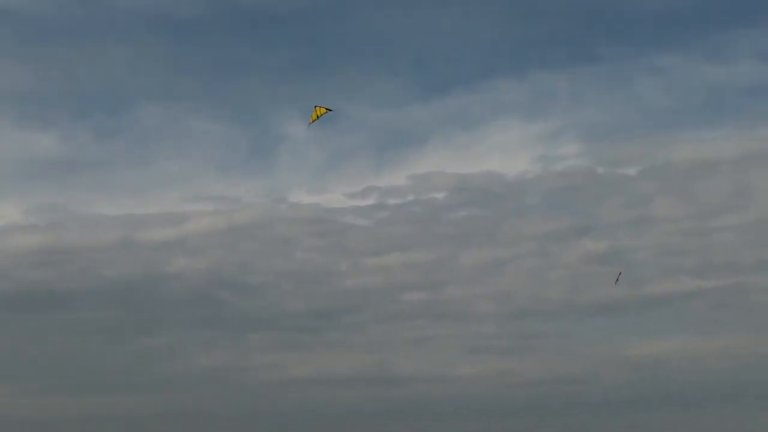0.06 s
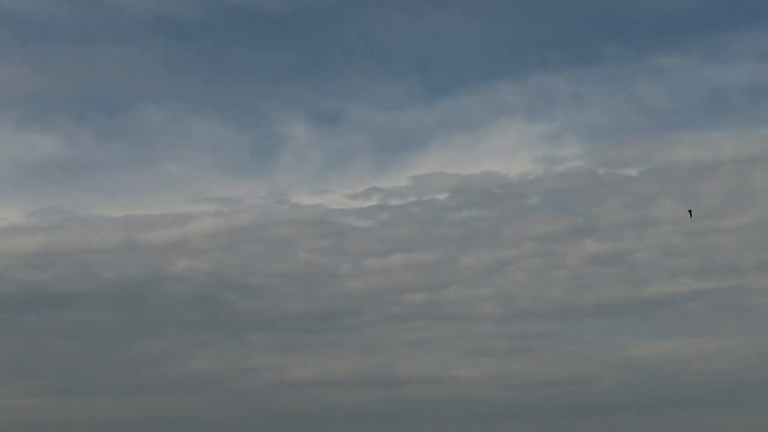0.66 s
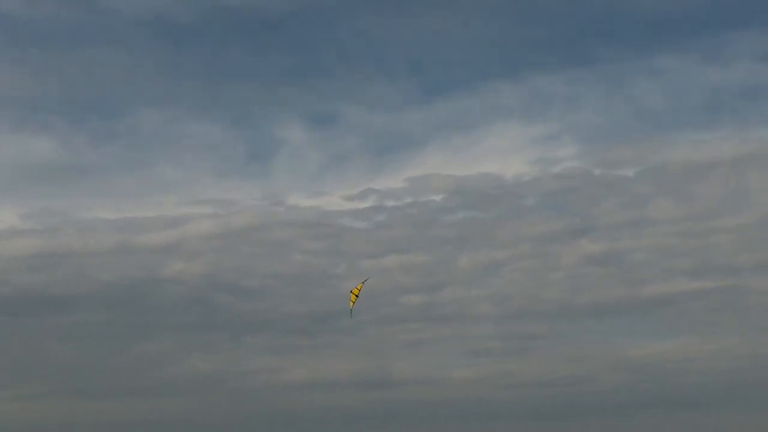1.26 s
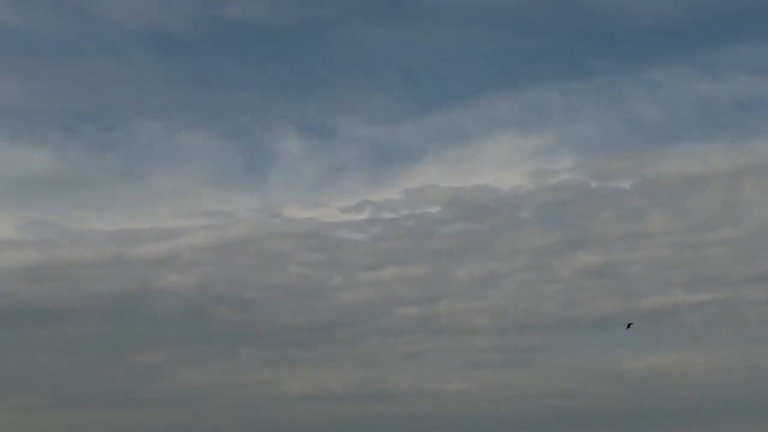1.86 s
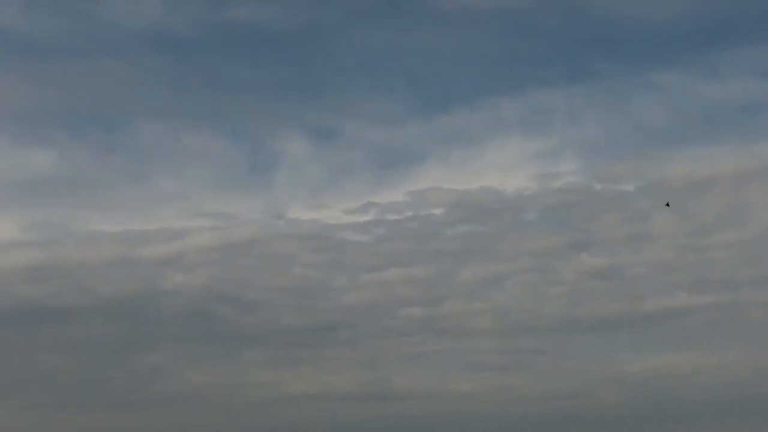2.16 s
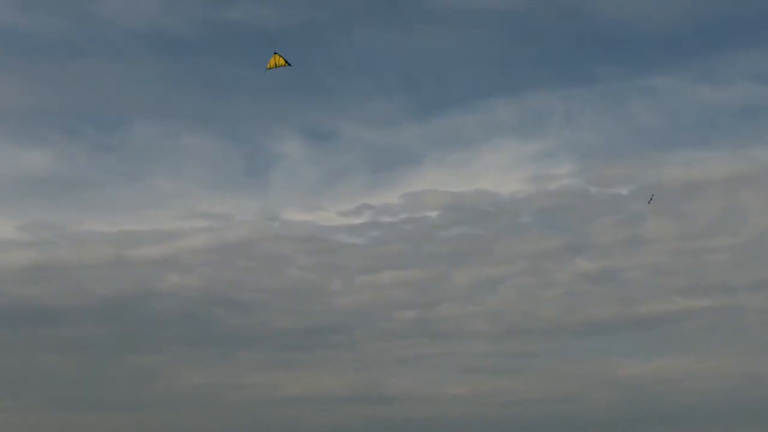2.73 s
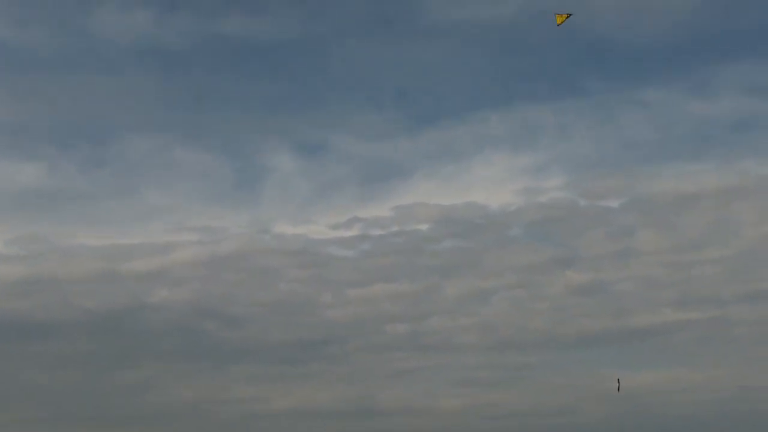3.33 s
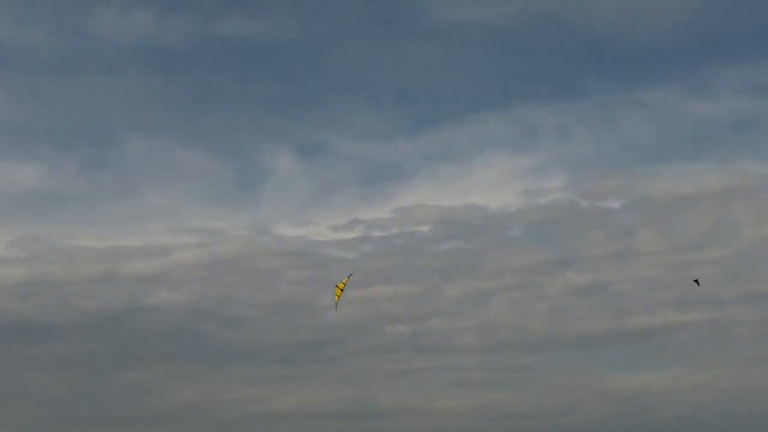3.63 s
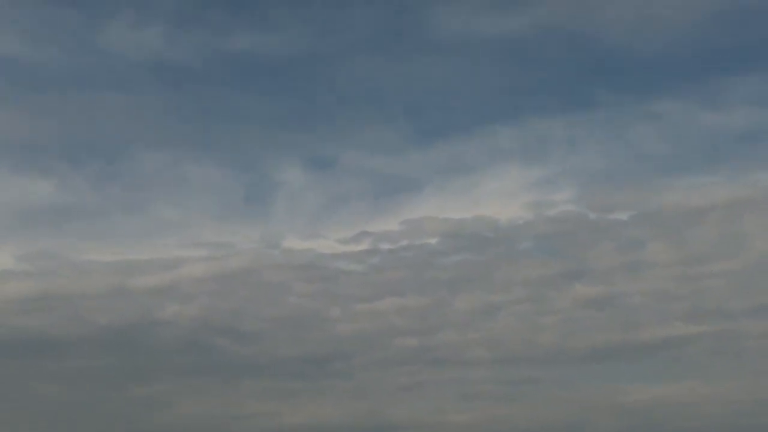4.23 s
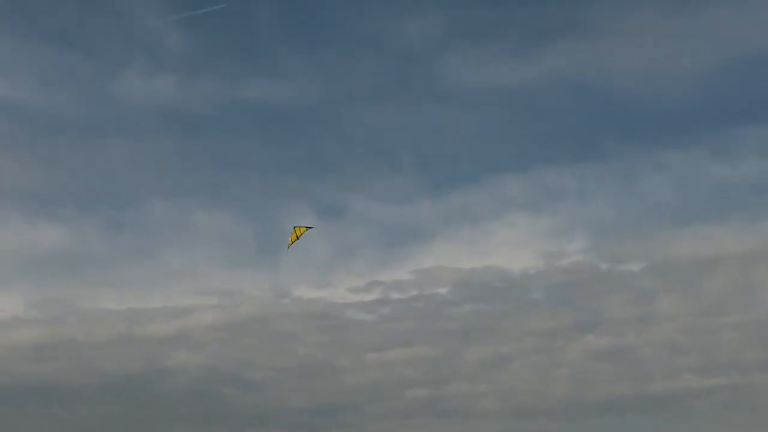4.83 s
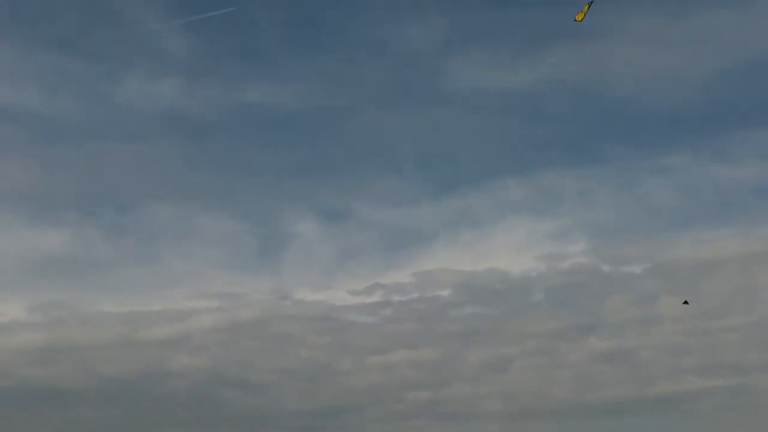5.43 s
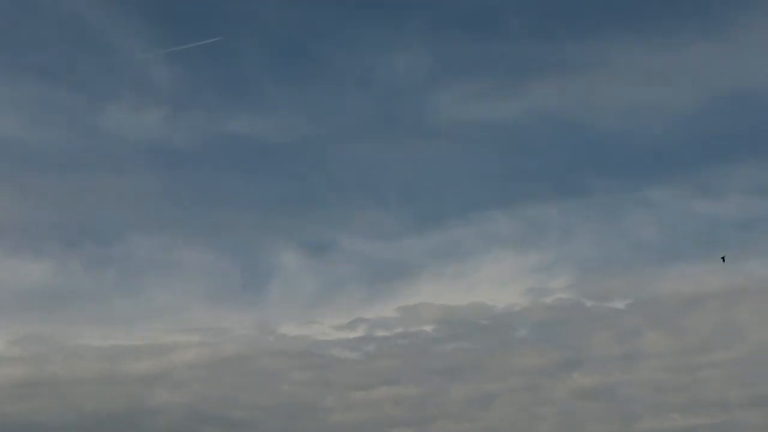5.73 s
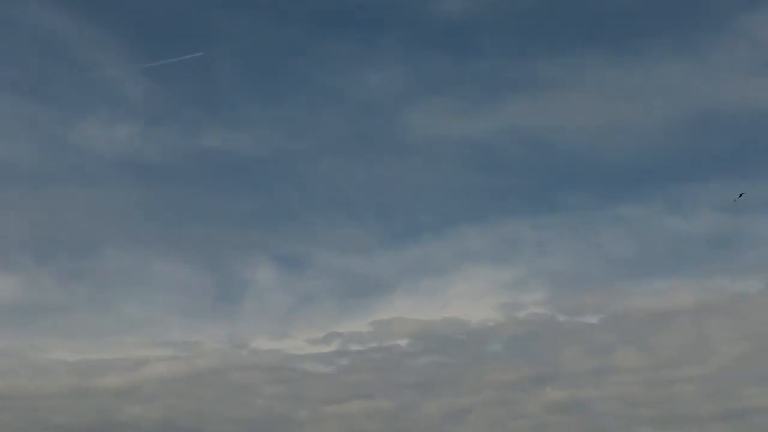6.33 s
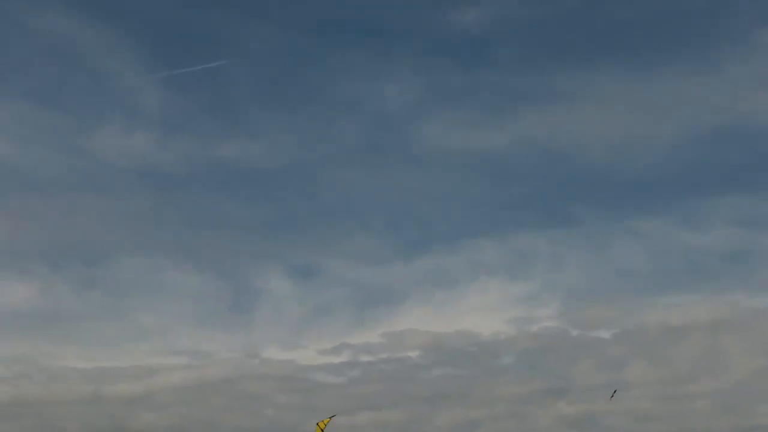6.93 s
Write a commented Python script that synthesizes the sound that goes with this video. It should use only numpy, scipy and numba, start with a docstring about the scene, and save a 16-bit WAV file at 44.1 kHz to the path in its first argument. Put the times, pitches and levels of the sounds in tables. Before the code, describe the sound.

A stunt kite flies about six quick loops outdoors in strong wind. Its taut lines make a wavering rush with a breathy whistle and a thinner, higher singing hiss, gliding up in each dive and down in each climb. The sound swells and fades roughly once a second. Wind rumbles and thuds on the microphone throughout, with harder gusts in the second half.

```python
"""A stunt kite's taut lines sing by vortex shedding as it flies six loops in strong wind.
The thick flying lines whistle low inside a rush, a thin cord sings high inside a hiss. Shedding frequency
is proportional to airspeed, so all glide up in each dive and down in each climb. The ground reflection
interferes with the direct sound, its lag following the kite's height: the rush flanges once a loop.
Wind rumbles and thuds on the microphone, whose limiter ducks on hard blows and whose filters cut notches."""
import sys
import numpy as np
from scipy import signal
from scipy.fft import rfft, irfft
from scipy.io import wavfile
from scipy.ndimage import uniform_filter1d
from numba import njit

SR = 44100
rng = np.random.default_rng(int(sys.argv[2]) if len(sys.argv) > 2 else 0)


def materialize(psi):
    """Save the field psi as 16-bit PCM at rate SR to the path in sys.argv[1].

    A 1-D psi becomes a single channel; in a 2-D psi each row is a channel.
    """
    bounded = np.clip(np.atleast_2d(psi).T, -1, 1)
    quanta = np.round(bounded * 32767).astype(np.int16)
    wavfile.write(sys.argv[1], SR, quanta)


N = 308259

# One row a loop, from the bottom of its dive: t/s, f/Hz when fastest, f/Hz when slowest,
# share of the loop until slowest, level/dB, echo lag at the top/s
LOOPS = [(.05, 1530, 1136, 0.717, -2, 0.0074), (1.48, 1820, 1180, 0.634, -1.3, 0.0083),
         (2.75, 1814, 1199, 0.59, .3, 0.0075), (3.86, 1870, 1117, 0.67, -0.5, 0.0076),
         (4.96, 1790, 1175, 0.53, 0, .00685), (6.04, 1855, 1210, 0.62, 0.5, 0.0072),
         (7.15, 1600, 1170, .66, -1.5, .0065)]


def undb(db):
    """Amplitude ratio of a level in decibels."""
    return 10 ** (np.asarray(db) / 20)


def curve(table):
    """Linear interpolation in time of each column of a (t/s, values) table."""
    times, *columns = np.transpose(table)
    return [np.interp(np.arange(N) / SR, times, column) for column in columns]


def shape(points, f):
    """Gain of a (frequency, gain/dB) spectrum on a log axis, falling 12 dB an octave past its end."""
    at, db = np.transpose(points)
    return undb(np.interp(np.log(f + 1e-6), np.log(at), db)) / np.maximum(f / at[-1], 1) ** 2


def colour(x, points):
    """Zero-phase filtering by a (f/Hz, gain/dB) spectrum."""
    return irfft(rfft(x) * shape(points, np.fft.rfftfreq(N, 1 / SR)), N)


def noise(points):
    """Stationary Gaussian noise of a given spectrum, rms 1."""
    x = colour(rng.standard_normal(N), points)
    return x / x.std()


def flutter(rate_hz):
    """Random modulation: rate_hz smoothed steps a second, spread near 1."""
    hold = int(SR / rate_hz)
    steps = np.repeat(rng.standard_normal(N // hold + 1), hold)
    return 1.3 * uniform_filter1d(uniform_filter1d(steps, hold), hold)[:N]


def gust_levels(rumble_trim_db, buffet_trim_db):
    """Incoherent addition: bell-shaped gusts add power to the breeze; gives rumble and buffeting in dB."""
    # wind between gusts: t/s, rumble level/dB, buffeting level/dB, both before the trims
    breeze = [(0.0, -31.5, -33.5), (0.29, -30.5, -34), (1.22, -32.5, -31.5), (1.61, -36.5, -40),
              (2.18, -29.5, -29.5), (2.57, -30, -31.5), (2.86, -38, -29.5), (3.1, -32.5, -43.5),
              (3.43, -37.5, -38.5), (3.93, -34, -28.5), (4.26, -32, -40), (5.24, -33, -34),
              (5.61, -32.5, -33.5), (6.99, -27.5, -27.5)]
    # gusts: t/s at the crest, duration/s, rumble level/dB, buffeting level/dB
    gusts = [(0.44, 0.068, -25.5, -25), (0.67, 0.045, -31, -34), (1.11, 0.12, -27, -30),
             (1.803, 0.11, -31, -39), (2.237, 0.097, -38, -34), (2.322, .05, -20, -41),
             (2.695, 0.15, -35, -29.5), (2.96, 0.16, -27, -30), (3.53, 0.15, -24.5, -29.5),
             (3.762, 0.075, -27, -29.5), (3.896, 0.063, -18.5, -36), (4.116, .08, -25, -31),
             (4.392, 0.051, -36, -31), (4.623, 0.15, -26, -33.5), (4.77, 0.11, -38, -41),
             (5.25, 0.15, -23, -32), (5.509, 0.067, -22.5, -26.5), (5.653, .07, -25, -38),
             (5.8, 0.25, -21.5, -25), (6.05, 0.13, -26.5, -50), (6.24, .16, -29, -23),
             (6.486, 0.066, -27, -31), (6.695, 0.2, -19, -30), (6.922, 0.064, -25, -30.5)]
    t = np.arange(N) / SR
    power = undb(np.array(curve(breeze)) + [[rumble_trim_db], [buffet_trim_db]]) ** 2
    for crest_s, duration, rumble, buffet in gusts:
        power += undb([[rumble], [buffet]]) ** 2 * np.exp(-(2 * (t - crest_s) / duration) ** 2)
    return 10 * np.log10(power)


def eddy(t, hz, turn):
    """Pressure pulse of a passing vortex, strongest at hz: the shorter it is, the wider its spectrum."""
    return np.real(np.exp(2j * np.pi * turn) / (1 - 2j * np.pi * hz * t) ** 2)


def small_eddies(buffet_db, over_db=13, scatter_db=6.0, hz=140, count=60):
    """Random eddies scale with the gust that carries them; rows of t/s, level/dB, f/Hz."""
    when, strength, size = rng.random((count, 3)).T
    db = buffet_db[(when * N).astype(int)] + over_db + scatter_db * (2 * strength - 1)
    return list(zip(when * N / SR, db, hz * 2 ** (size - .5)))


def thuds(buffet_db, spread_s=0.01005, swirl_db=-10, thud_db=-3.5, slap_db=-24, slap_s=0.0051):
    """Vortex impact: each eddy hits amid six weaker ones; small, hard ones break up in a slap."""
    # strongest eddies at the microphone: t/s, relative level/dB, f/Hz of the spectral peak
    strong_eddies = [(.449, -14.5, 144), (.688, -12, 124), (1.063, -12, 133), (1.131, -13.5, 127),
                     (1.252, -8.5, 138), (2.143, -11.5, 99), (2.187, -13, 107), (2.249, -9.5, 148),
                     (2.311, -10.5, 137), (2.871, -9.5, 111), (3.589, -1, 121), (3.777, -11.5, 160),
                     (3.815, -9.5, 136), (3.947, -1, 71.4), (3.971, -7.5, 110), (4.374, -12.5, 165),
                     (4.626, -11.5, 137), (5.338, -9.5, 104), (5.462, -10, 105), (5.506, -2.5, 274),
                     (5.522, -5.5, 194), (5.607, -7.5, 96), (5.663, 0, 125), (5.748, -4, 174),
                     (5.763, -6, 200), (5.875, -9.5, 205), (5.882, 1.5, 140), (6.195, -4, 120),
                     (6.284, -8, 101), (6.329, -6.5, 199), (6.347, -5.5, 133), (6.677, -11, 186),
                     (6.693, -10, 169), (6.789, -10, 200)]
    # an eddy breaking up: f/Hz, gain/dB
    slap_spectrum = [(200, -13), (500, -6), (900, 5), (1400, -6.5), (2200, -12), (4000, -50)]
    eddies = strong_eddies + small_eddies(buffet_db)
    pulses, breakup, reach = np.zeros(N), np.zeros(N), SR // 16
    for (hit_s, db, hz), chance in zip(eddies, rng.random((len(eddies), 7, 2))):
        centre = int(hit_s * SR)
        at = np.arange(max(centre - reach, 0), min(centre + reach, N))
        t = at / SR - hit_s
        core = eddy(t, hz, chance[0, 0])
        swirl = sum(eddy(t - spread_s * (2 * when - 1), 0.96 * hz, turn) for when, turn in chance[1:])
        pulses[at] += undb(db + thud_db) * (core + undb(swirl_db) * swirl) * np.hanning(len(at))
        breakup[at] += undb(1.62 * db + slap_db) * (hz / 170) ** 2 * np.exp(-(t / slap_s) ** 2)
    return pulses + breakup * noise(slap_spectrum)


def wind(brisk_db=-30):
    """Turbulent pressure: large eddies rumble, small ones buffet in fits; open air hisses far off."""
    # large, small and finest turbulence, and the distant air: f/Hz, gain/dB
    rumble_spectrum = [(8, 4.5), (22, 3), (45, -1.5), (85, -5), (150, -19), (300, -29.5), (700, -86)]
    buffet_spectrum = [(40, 0.5), (110, -0.5), (190, -3.5), (300, -13.5), (500, -24), (900, -31)]
    flurry_spectrum = [(120, -23.5), (280, 6.5), (420, -3.5), (700, -12), (1100, -16.5), (2200, -27)]
    air_spectrum = [(200, -45), (700, -6.5), (2000, -20.5), (5000, -25), (9000, -17), (15000, -23)]
    rumble_db, buffet_db = gust_levels(rumble_trim_db=2.0, buffet_trim_db=-2.0)
    fits = flutter(rate_hz=45)
    gust_db = buffet_db + 3 * fits
    rumble = noise(rumble_spectrum) * undb(rumble_db + 2.1 * fits)
    buffet = noise(buffet_spectrum) * undb(gust_db)
    # the finest turbulence grows faster than the gust, so hard gusts are brighter
    flurry = noise(flurry_spectrum) * undb(-43.0 + 1.65 * (gust_db - brisk_db))
    return rumble + buffet + flurry + thuds(buffet_db) + noise(air_spectrum) * undb(-53.0)


def loop_phase():
    """Phase of the circular motion: which loop the kite is in, and the share of it flown."""
    starts = np.transpose(LOOPS)[0]
    turns = np.interp(np.arange(N) / SR, starts, np.arange(len(starts)))
    return turns.astype(int), turns % 1


def ground_echo(direct, top_share=.445, low_lag_s=.0019):
    """Two-path interference: a duller reflection, later as the kite rises, makes a sweeping comb."""
    # reflection off the ground: f/Hz, gain/dB
    reflectance = [(500, -3), (1500, -5), (3000, -10), (6000, -20)]
    loop, share = loop_phase()
    # on a circle the height follows a half cosine between turning points
    height = (1 - np.cos(np.pi * np.interp(share, [0, top_share, 1], [0, 1, 0]))) / 2
    top_lag_s = np.transpose(LOOPS)[-1][loop]
    lag_s = low_lag_s + height * (top_lag_s - low_lag_s)
    return direct + np.interp(np.arange(N) - SR * lag_s, np.arange(N), colour(direct, reflectance))


def airspeed_pitch(climb_power, dive_power, lag_s, smooth_s):
    """Strouhal's law: pitch follows airspeed, sinking in the climb and rising ever faster in the dive."""
    loop, share = loop_phase()
    _, fast_hz, slow_hz, slowest, _, _ = np.transpose(LOOPS)
    climb = np.maximum(1 - share / slowest[loop], 0) ** climb_power
    dive = np.maximum((share - slowest[loop]) / (1 - slowest[loop]), 0) ** dive_power
    low_hz = slow_hz[loop]
    pitch = low_hz + climb * (fast_hz[loop] - low_hz) + dive * (fast_hz[loop + 1] - low_hz)
    t = np.arange(N) / SR
    return uniform_filter1d(np.interp(t - lag_s, t, pitch), max(int(smooth_s * SR), 1))


def radiated_db(pitch, beams, octave_db, cruise_hz=1400):
    """Directivity: level rises as a beam sweeps the microphone, and by octave_db as airspeed doubles."""
    _, share = loop_phase()
    _, _, _, loop_db, _ = curve(LOOPS)
    power = 1
    for centre, width, db in beams:
        off_axis = (share - centre + .5) % 1 - .5
        power += undb(db) ** 2 * np.exp(-(off_axis / width) ** 2)
    return loop_db + octave_db * np.log2(pitch / cruise_hz) + 10 * np.log10(power)


def vortex_noise(pitch, gain_at, frame=1024):
    """Strouhal similarity: noise of rms near 1 whose whole spectrum, gain_at(f/pitch), glides with pitch."""
    framing = dict(nperseg=frame, noverlap=frame - frame // 4)
    f, t, spectra = signal.stft(rng.standard_normal(N), SR, **framing)
    gain = gain_at(f[:, None] / np.interp(t, np.arange(N) / SR, pitch))
    gain /= np.sqrt(np.mean(gain ** 2, axis=0))
    return signal.istft(spectra * gain, SR, **framing)[1][:N]


def aeolian_tone(pitch, width, steep):
    """Nearly periodic shedding: a noise band, width a share of the pitch, its skirts set by steep."""
    return vortex_noise(pitch, lambda ratio: (1 + (np.log(ratio + 1e-6) / width) ** 2) ** (-steep / 2))


def thin_cord(pitch_ratio=4.59):
    """A thinner cylinder sheds vortices faster; its drag pulses at twice the pitch, in a broad hiss."""
    # the cord's shedding noise: f/pitch, gain/dB
    hiss_spectrum = [(.45, -4), (.64, 4), (.8, -2.5), (1.0, -12), (1.25, -9), (1.5, -2), (1.8, 4),
                     (2.02, 6.5), (2.18, 6), (2.35, -1), (2.8, -28)]
    # radiation lobes: centre/loop, width/loop, gain/dB
    tone_beams = [(.29, 0.14, 14.7), (.8, 0.21, 6.65)]
    hiss_beams = [(.235, 0.13, 24.3), (.79, 0.12, 15.6)]
    line_pitch = airspeed_pitch(climb_power=1.7, dive_power=2.1, lag_s=0.018, smooth_s=0.33)
    pitch = pitch_ratio * line_pitch
    # the tone is thin while the kite gathers speed and breathy as it slows
    glide_hz_per_s = uniform_filter1d(np.gradient(pitch) * SR, SR // 10)
    clarity = .33 + .17 * np.tanh(glide_hz_per_s / 3000)
    core = aeolian_tone(pitch, width=.02, steep=1.7)
    breath = aeolian_tone(pitch, width=0.045, steep=0.74)
    tone = np.sqrt(clarity) * core + np.sqrt(1 - clarity) * breath
    drag_tone = undb(-13) * aeolian_tone(2 * pitch, width=.035, steep=2)
    hiss = vortex_noise(pitch, lambda ratio: shape(hiss_spectrum, ratio)) + drag_tone
    tone_db = -54.5 + radiated_db(line_pitch, tone_beams, octave_db=4.5) + 1.7 * flutter(rate_hz=45)
    hiss_db = -61.5 + radiated_db(line_pitch, hiss_beams, octave_db=18.5) + 1.2 * flutter(rate_hz=45)
    fading_db = 1.2 * flutter(rate_hz=14)  # the tone comes and goes in the unsteady air
    return tone * undb(tone_db + fading_db) + hiss * undb(hiss_db)


def flying_lines():
    """Vortex shedding: the fastest stretch gives the tone; turbulence adds a rush and flutters both."""
    # turbulence along the lines: f/pitch, gain/dB
    rush_spectrum = [(.33, -8.5), (.5, 2), (.68, -1.5), (1.2, -0.5), (1.45, 5), (1.9, 4.5), (2.4, 1.5),
                     (2.8, 1.5), (3.4, 1), (4.3, -3), (5.6, -8), (9, -57)]
    # radiation lobes: centre/loop, width/loop, gain/dB
    tone_beams = [(.03, 0.044, -0.5), (.27, 0.24, 4.5)]
    rush_beams = [(.05, 0.24, -3.6), (.27, 0.28, 2.8)]
    pitch = airspeed_pitch(climb_power=2.3, dive_power=1.8, lag_s=.025, smooth_s=.08)
    # the tone is clear in the slow climb and breaks up into a wide band in the dive
    clarity = np.interp(pitch, [1250, 1580], [.78, .1])
    core = aeolian_tone(pitch, width=.064, steep=2.5)
    breath = aeolian_tone(pitch, width=.25, steep=2)
    tone = np.sqrt(clarity) * core + np.sqrt(1 - clarity) * breath
    rush = vortex_noise(pitch, lambda ratio: shape(rush_spectrum, ratio))
    tone_db = -47.5 + radiated_db(pitch, tone_beams, octave_db=11) + 1.13 * flutter(rate_hz=35)
    rush_db = -45.5 + radiated_db(pitch, rush_beams, octave_db=5.5) + 1.23 * flutter(rate_hz=45)
    return tone * undb(tone_db) + rush * undb(rush_db)


def scene():
    """Superposition at one microphone: lines and cord, direct and off the ground, and the wind."""
    kite = flying_lines() + thin_cord()
    kite *= undb(1.2 * flutter(rate_hz=30))  # turbulent air on the way makes the sound waver
    return (ground_echo(kite) + wind())[None]


@njit
def peak_envelope(x, attack_s, release_s):
    """Envelope detection: a one-pole lag on the rectified signal, quick up and slow down."""
    out, level = np.empty(len(x)), 0.
    for i in range(len(x)):
        level += (abs(x[i]) - level) / (SR * (attack_s if abs(x[i]) > level else release_s))
        out[i] = level
    return out


def limiter(x, threshold_db, attack_s, release_s):
    """Gain reduction: everything ducks for a moment when a blow passes the threshold."""
    peak = uniform_filter1d(peak_envelope(x, attack_s, release_s), SR // 300)
    return x / np.maximum(peak / undb(threshold_db), 1)


def record(dry, cutoff_hz=15330):
    """Signal chain in cascade: microphone response, limiter, soft start, notches and low-pass."""
    # the microphone's response: f/Hz, gain/dB
    response = [(1000, 2.5), (4000, 2.5), (6500, 4.5), (8300, 1.5), (10500, 2.5), (12200, -4.5),
                (13500, -11.5), (14600, -10)]
    # band-stop filters: f/Hz, bandwidth/Hz
    notches = [(4200, 960), (7870, 5370), (8800, 800), (12600, 1640)]
    x = limiter(colour(dry[0], response), threshold_db=-8.5, attack_s=.0004, release_s=0.062)
    x *= np.minimum(np.arange(N) / (SR // 200), 1)  # 5 ms fade-in
    for hz, bandwidth in notches:
        x = signal.lfilter(*signal.iirnotch(hz, hz / bandwidth, fs=SR), x)
    return signal.sosfilt(signal.ellip(12, .2, 80, cutoff_hz, fs=SR, output="sos"), x)[None]


dry = scene()
out = record(dry)
materialize(out)
```